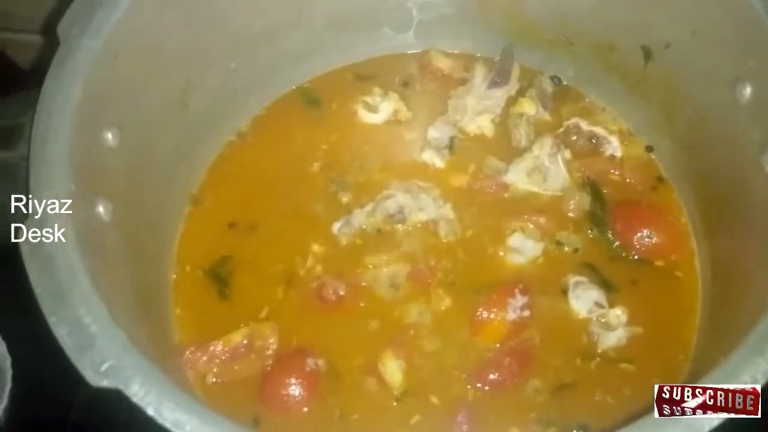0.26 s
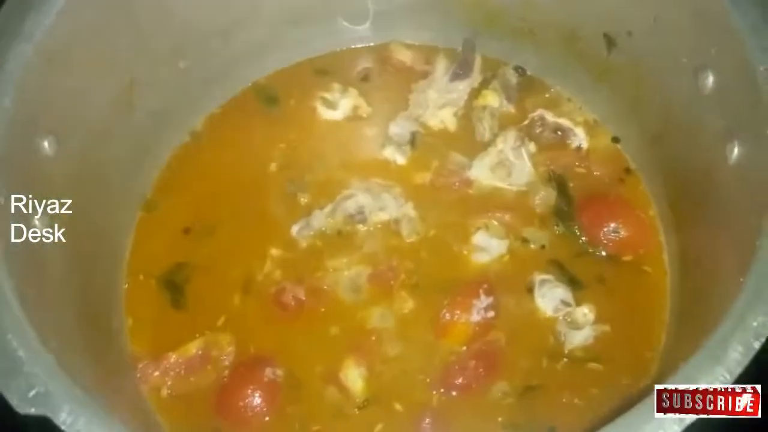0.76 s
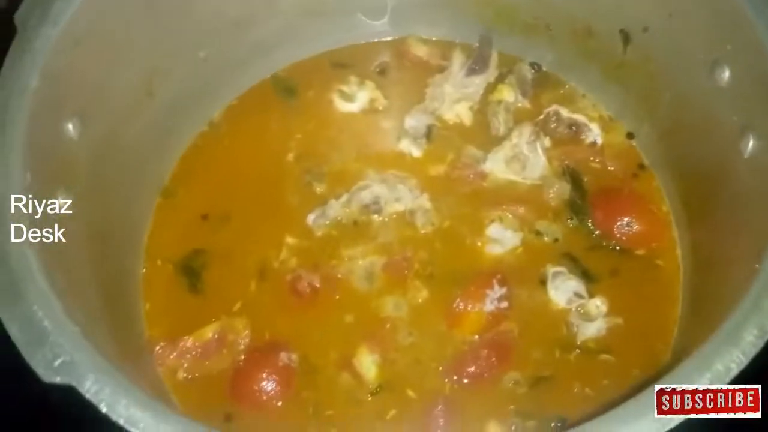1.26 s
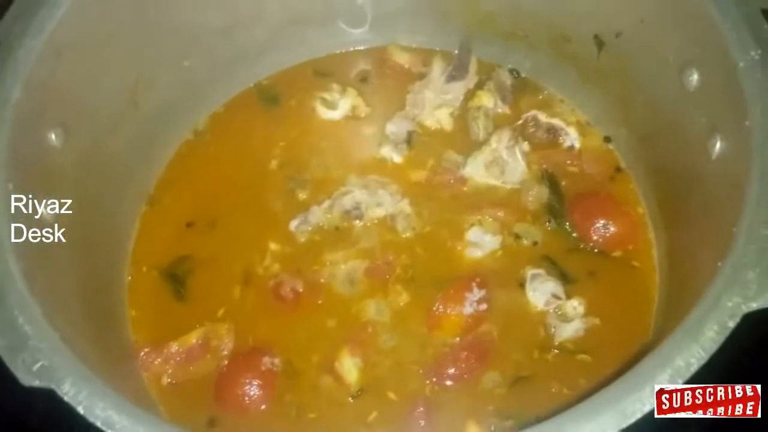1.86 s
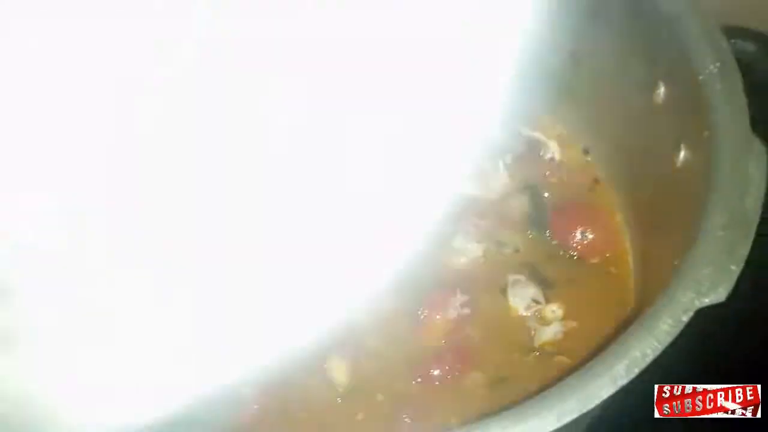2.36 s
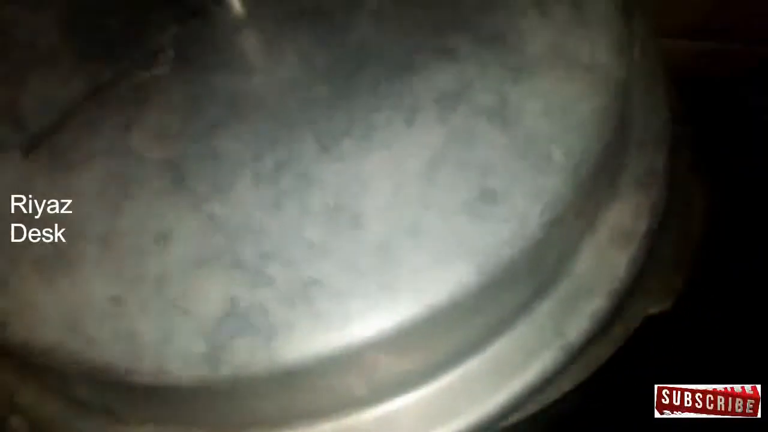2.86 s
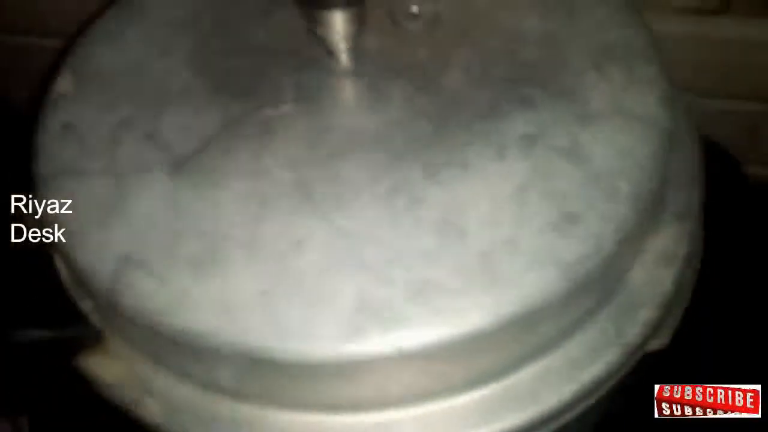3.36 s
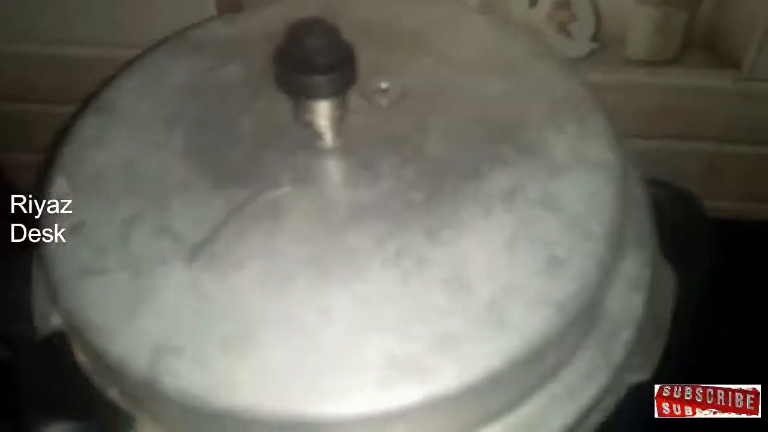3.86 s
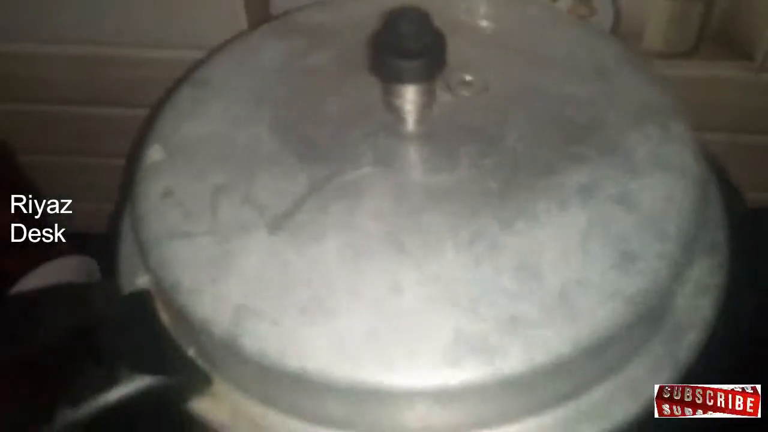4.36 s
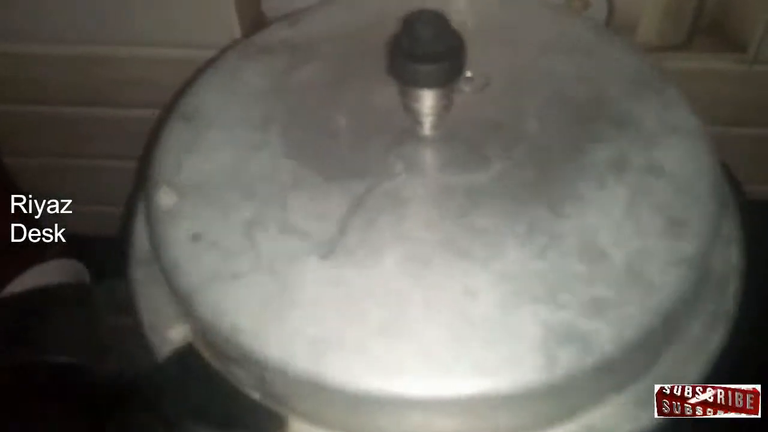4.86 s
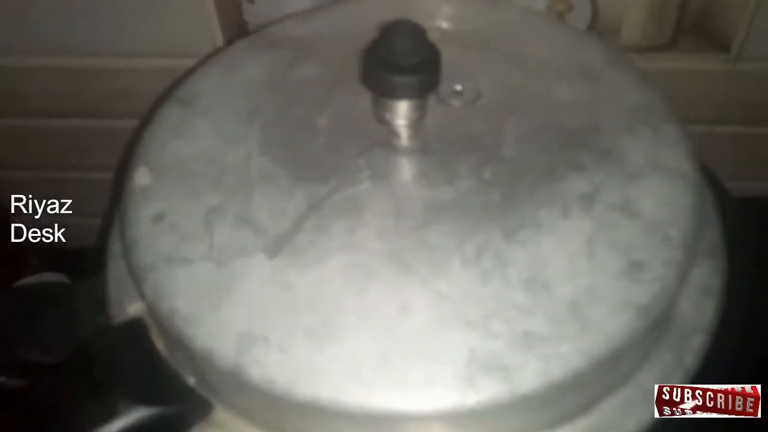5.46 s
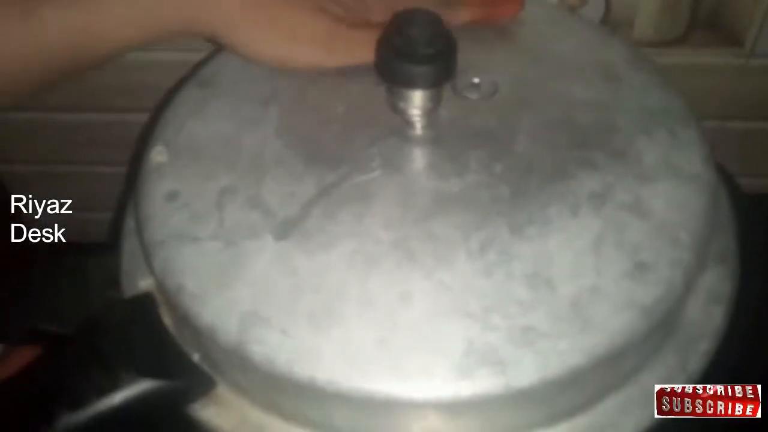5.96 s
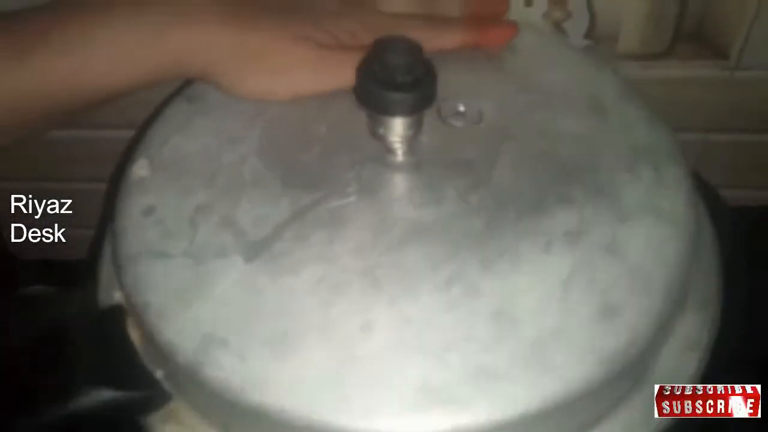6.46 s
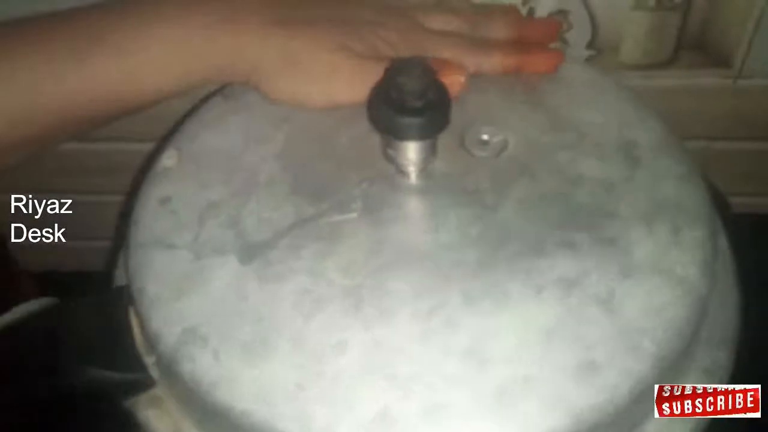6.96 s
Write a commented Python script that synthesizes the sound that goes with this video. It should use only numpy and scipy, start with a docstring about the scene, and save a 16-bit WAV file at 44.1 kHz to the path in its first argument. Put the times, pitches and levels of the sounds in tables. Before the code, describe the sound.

A metal pressure cooker lid knocks, then clanks, scrapes and judders onto its pot, locking with sharp clacks in a small hard kitchen.

```python
"""An aluminium pressure cooker lid is knocked, set on the pot, turned on its rubber gasket and locked.
Knocks come first, then faint pings; blows, scrapes and judder follow from 2.95 s, a broken tone from 5.27 s.
Noise bursts ring the lid's modes and the air in the pot; a small hard room answers with decaying noise.
Filtered noise gives a hiss and rumble throughout; all is almost mono and stops short at 7.155 s."""
import sys
import numpy as np
from scipy import signal
from scipy.fft import rfft, irfft, next_fast_len
from scipy.io import wavfile
from scipy.ndimage import uniform_filter1d, map_coordinates

SR = 44100
rng = np.random.default_rng(int(sys.argv[2]) if len(sys.argv) > 2 else 0)


def store_wav(level_fs):
    """Save 16-bit WAV to argv[1]."""
    pcm = np.round(np.clip(np.atleast_2d(level_fs), -1, 1) * 32767)
    wavfile.write(sys.argv[1], SR, pcm.T.astype(np.int16))


N = 317696
SIZE = next_fast_len(N + SR // 2)
HZ = np.fft.rfftfreq(SIZE, 1 / SR)
TIME = np.arange(N) / SR


def amp(db):
    """dB to gain."""
    return 10 ** (np.asarray(db) / 20)


def unit(x):
    """Scaled to rms 1."""
    return x / np.sqrt(np.mean(np.abs(x) ** 2) + 1e-20)


def along(points, hz=HZ):
    """(Hz, value) points interpolated on a log frequency axis."""
    point_hz, value = np.transpose(points)
    return np.interp(np.log(hz + 1), np.log(point_hz + 1), value)


def curve(tables, index):
    """One column of timed rows as a value per sample."""
    rows = np.vstack(tables)
    return np.interp(TIME, rows[:, 0], rows[:, index])


def strokes(tables, index):
    """A dB column as gain, silent outside its tables, with soft edges."""
    gain = np.zeros(N)
    for table in tables:
        rows = np.array(table)
        gain = gain + np.interp(TIME, rows[:, 0], amp(rows[:, index]), 0, 0)
    return uniform_filter1d(uniform_filter1d(gain, size=300), size=300)


def wobble(rate):
    """A smooth random curve, rate knots a second."""
    return map_coordinates(rng.standard_normal(int(N * rate / SR) + 4), [TIME * rate])


def filtered(x, response):
    """x times a response on the HZ grid."""
    return irfft(rfft(x, SIZE) * response, SIZE)[..., :N]


def causal(gain):
    """The minimum-phase response with this gain, by folding the cepstrum."""
    cepstrum = irfft(np.log(gain + 1e-6), SIZE)
    cepstrum[1:SIZE // 2] *= 2
    cepstrum[SIZE // 2 + 1:] = 0
    return np.exp(rfft(cepstrum))


def narrow(pitch_hz, width_hz):
    """Noise in a steep resonance that follows a pitch curve; its size wavers less than pure noise."""
    slow = rng.standard_normal(N) + 1j * rng.standard_normal(N)
    for _ in range(3):
        slow = signal.lfilter([1], [1, -np.exp(-2 * np.pi * width_hz / SR)], slow)
    slow = unit(slow)
    slow = slow / (np.abs(slow) + 0.19)
    carrier = np.exp(2j * np.pi * np.cumsum(pitch_hz) / SR)
    return unit(np.real(slow * carrier))


def after_blows(levels_db, t60_s):
    """An envelope that rises within milliseconds of each blow and dies away."""
    kicks = np.zeros(N)
    np.add.at(kicks, [round(row[0] * SR) for row in BLOWS], amp(levels_db))
    rising = signal.lfilter([.01], [1, -.99], kicks) * 100
    return signal.lfilter([.01], [1, -amp(-60 / t60_s / SR)], rising)


# blows on the metal: start_s, clank_db, body_re_clank_db, edge_re_clank_db, thud_db, rattle_hold_s,
# rattle_t60_s (at least 0.005), spot_hz (note of the struck spot), spot_re_clank_db
BLOWS = [(0.0004, -23, -7.5, -12.5, -27.5, 0.0032, 0.091, 1935, -2),
         (0.3681, -31.5, 0.5, -9, -32, 0.033, 0.076, 2200, 7.5),
         (2.9577, -13.5, -7, -15, -20, 0.001, 0.033, 1423, -3.5),
         (2.9874, -14, -4, -7, -23, 0.00056, 0.053, 2170, -12),
         (3.0033, -30, -10, -8, -43.5, 0.0015, 0.075, 1670, 1),
         (3.085, -38.5, 4.5, -5.5, -26.5, 0.0044, .02, 1660, 8.5),
         (3.1317, -33, -6, -11, -54, .002, 0.026, 2170, -16),
         (3.2548, -49.5, 16.5, -8, -33, 0.0017, 0.026, 2024, 13.5),
         (3.3253, -49.5, 9, -2.5, -25.5, 0.0017, 0.03, 2133, 18.5),
         (3.58, -29, -2, -11, -24.5, 0.0011, 0.05, 1049, -2),
         (3.8794, -59, -12, -3, -28.5, 0.0025, 0.021, 1522, 5),
         (4.0646, -41.5, -13, -16, -31.5, 0.0024, .065, 1089, 2.5),
         (4.0977, -33.5, 1, -5.5, -23, 0.0013, .053, 1013, 0),
         (4.1694, -45, -4, -8, -45.5, 0.0054, 0.015, 1079, 7),
         (4.292, -39.5, 2, -20, -47, 0.0031, 0.041, 1501, -13),
         (4.353, -51.5, -24, -7.5, -21.5, 0.0037, .041, 1130, 3),
         (4.386, -29, 2.5, -17.5, -18, 0.0018, 0.014, 1472, -14),
         (4.398, -24.5, -14.5, -13.5, -27, 0.0018, 0.059, 1470, 7),
         (4.4695, -14.5, -12, -12.5, -43, 0.00091, 0.036, 2203, 0),
         (4.587, -40, -17, -8, -51, 0.0012, .03, 1531, 6.5),
         (4.6683, -56, 13, -19, -36.5, 0.0014, 0.05, 1797, 15),
         (4.7512, -40.5, 7, -6, -35, 0.00069, 0.029, 1093, -16),
         (4.8569, -28, 7, -1, -65, .002, .023, 1415, 4),
         (4.8673, -15, -1, -10.5, -34, 0.00067, .049, 2130, -6.5),
         (5.1417, -14, -6, -9.5, -24.5, 0.0013, 0.067, 1190, -4),
         (5.1847, -19.5, -3.5, -13.5, -36, 0.001, 0.045, 2116, -3.5),
         (5.3397, -48.5, 3, -11, -46, 0.0023, 0.044, 886, 0),
         (5.6315, -40, -5.5, -21.5, -50, 0.0005, 0.051, 2078, -2.5),
         (5.686, -49, 3, -28, -41.5, 0.0013, 0.043, 1088, 1),
         (5.7775, -55.5, 1, -40, -52, 0.0019, .07, 902, 6),
         (6.0906, -44, 10, -48, -30, 0.0018, 0.088, 920, -11),
         (6.4404, -55.5, 11.5, -3, -35.5, 0.0023, 0.063, 2196, 10),
         (6.4551, -21, -2.5, -17, -32.5, 0.0026, 0.035, 2308, -7.5),
         (6.486, -46, -14, -5, -31, 0.0012, .048, 987, 15.5),
         (6.729, -22, -14.5, -10, -45, 0.0025, 0.026, 2140, -1),
         (6.9715, -31, 0, -30, -40.5, 0.0012, 0.064, 2022, -2),
         (7.0039, -28.5, -10.5, -17.5, -40, 0.009, 0.046, 1960, -2)]
# strokes of the lid dragged round the rim: time_s, scrape_db, edge_re_scrape_db
SCRAPE = [
    [(3.02, -36.5, -17.5), (3.1, -47.5, -17), (3.2, -52.5, -8.5), (3.27, -44, -9.5), (3.33, -50.5, -2.5),
     (3.42, -74.5, -16), (3.5, -57, -11), (3.57, -51, -12)],
    [(3.6, -39.5, -8.5), (3.65, -60, -16.5), (3.7, -67, 3.5), (3.78, -78, -11)],
    [(3.79, -69, -14.5), (3.84, -48, -14), (3.89, -44, -10.5), (3.93, -46, -16.5), (3.98, -43, -11.5),
     (4.05, -43.5, -4), (4.1, -41.5, -13), (4.16, -49.5, -8), (4.24, -75, -7.5), (4.28, -56, 6.5)],
    [(4.3, -49.5, -9), (4.34, -49.5, -11), (4.37, -39, -14.5), (4.405, -35.5, -8), (4.44, -47, -11.5),
     (4.465, -49.5, -12)],
    [(4.5, -61, -8), (4.58, -57, -10), (4.64, -57.5, -11), (4.7, -55, -7.5), (4.79, -50.5, -16.5),
     (4.855, -44, -9)],
    [(4.9, -36, -11.5), (4.95, -48.5, -11), (5.0, -52, -11.5), (5.08, -57, -8.5), (5.135, -54.5, 0.5)],
    [(6.48, -49, -3.5), (6.53, -49.5, -5), (6.6, -52.5, -6.5), (6.67, -56, -6.5), (6.72, -51, -5.5)],
    [(6.76, -61.5, 0), (6.82, -61, -1.5), (6.89, -67, -2.5), (6.96, -62, -8), (7.06, -69.5, 1),
     (7.12, -62.5, 0), (7.15, -59, 2)],
]
# force bands thud, body, clank, edge, top: low_hz, high_hz
BANDS = [(0, 370), (420, 1400), (1400, 3200), (3200, 8500), (8500, 30000)]
RISE_S = 0.0037  # rattle
CRACK_RISE_S, CRACK_DB, CRACK_T60_S = 0.00065, 4, 0.0049  # first crack, re rattle
CRACK_LOSS_DB_PER_S = 918  # per second of rattle hold
CRACK_TILT_DB = -1.5  # crack is weaker in the high bands
SHIVER_DB, SHIVER_T60_S = -26, 0.073  # lid shivers on the rim after a blow
TOP_DB, TOP_DB_PER_DB = -9, 0.29  # top band re edge at a 0 dB clank; its loss per dB of weaker blow
SCRAPE_BODY_DB, SCRAPE_TOP_DB = -1, -16  # body re scrape, top re edge


def contact():
    """Force on the metal per band, and the struck spot's note: blows crack and rattle, scrapes are gritty."""
    force = np.zeros((len(BANDS) + 1, N + SR))  # last row: struck spot
    t = np.arange(SR // 4) / SR
    spot_hz = np.full(N, 2000.)
    tilt = np.array([[-2], [-.5], [0], [.5], [1], [-1]])
    for start_s, db, body_db, edge_db, thud_db, hold_s, t60_s, hz, spot_db in BLOWS:
        rattle = amp(-60 * np.clip(t - hold_s, 0, None) / max(t60_s, .005))
        rattle = rattle + amp(SHIVER_DB - 60 * t / SHIVER_T60_S)
        crack_db = CRACK_DB - CRACK_LOSS_DB_PER_S * hold_s - 60 * t / CRACK_T60_S
        crack = (1 - np.exp(-t / CRACK_RISE_S)) * amp(crack_db)
        shape = (1 - np.exp(-t / RISE_S)) * rattle + amp(CRACK_TILT_DB * tilt) * crack
        top_db = db + edge_db + TOP_DB + TOP_DB_PER_DB * db
        share = amp([thud_db, db + body_db, db, db + edge_db, top_db, db + spot_db])
        first = round(start_s * SR)
        force[:, first:][:, :len(t)] += share[:, None] * shape
        spot_hz[first:] = hz

    clumps_db = 1.5 * wobble(35) + 3 * wobble(250)  # grains of grit come in clumps
    edge_db = curve(SCRAPE, index=2)
    top_db = edge_db + SCRAPE_TOP_DB + 3 * wobble(20)
    scrape = strokes(SCRAPE, index=1)
    for row, band_db in enumerate((SCRAPE_BODY_DB, 0, edge_db, top_db), start=1):
        grit = unit(amp(clumps_db + 1.6 * wobble(18)))
        force[row, :N] += scrape * amp(band_db) * grit

    noise = force[:-1, :N] * rng.standard_normal(N)
    spot = uniform_filter1d(force[-1, :N], size=30) * narrow(spot_hz, width_hz=130)
    return noise, spot


HAND_S, HAND_FADE_S, HAND_DB = 5.54, 0.33, -12


def hand_damping_db():
    """Drive of the lid's modes: a hand on the lid damps its ring."""
    return HAND_DB * np.clip((TIME - HAND_S) / HAND_FADE_S, 0, 1)


# colour of a blow, relative density: freq_hz, level_db_per_hz
METAL = [(50, -27), (100, -9), (250, -4), (420, 0), (1100, -4.5), (2200, -2), (2600, -10.5), (4000, -21.5),
         (5700, -16.5), (7300, -31), (9500, -41.5), (13400, -38.5), (14700, -27), (15900, -28),
         (16800, -120)]
# modes of the lid: freq_hz, level_re_clank_db, t60_s (limited to 0.02-0.13 when played)
LID = [(379, -1, 0.21), (456, -1.5, 0.25), (749, -8, 0.36), (975, 5.5, 0.044), (1102, 5.5, 0.07),
       (1483, 4, 0.17), (1634, 4, 0.2), (1950, 2, 0.3), (2103, -5.5, 0.36), (2131, 4, 0.15),
       (2310, -20.5, 0.22), (2904, 2, 0.015), (3080, -3, 0.13), (3674, 5.5, 0.058), (4330, -4.5, 0.18),
       (5170, -2.5, 0.23), (5880, 0, 0.032), (6470, 0.5, 0.021), (8900, -1.5, 0.085), (10770, 8.5, 0.017)]


def mode(centre_hz, level_db, t60_s):
    """Response of one damped resonance; the gasket keeps every ring short."""
    width_hz = np.log(1000) / (np.pi * np.clip(t60_s, .02, .13))
    loss = 1j * HZ * width_hz
    return amp(level_db) * loss / (centre_hz ** 2 - HZ ** 2 + loss)


def lid():
    """The force sounds as a broad clank and rings the lid's modes."""
    colour = amp(along(METAL))
    force, clank = contact()
    for band_force, (low_hz, high_hz) in zip(force, BANDS):
        slopes = (1 + (low_hz / (HZ + 1)) ** 14) * (1 + (HZ / high_hz) ** 14)
        clank = clank + filtered(band_force, unit(causal(colour / np.sqrt(slopes))))
    free_db, out = hand_damping_db(), clank
    for k in range(4):  # the point of contact wanders: each set of modes gets its own varying drive
        drive = clank * amp(free_db + 4.9 * wobble(4.9))
        out = out + filtered(drive, sum(mode(*row) for row in LID[k::4]))
    return out + rim()


RIM_HZ, RIM_WIDTH_HZ = 2195, 30  # strongest note
SING_DB, SING_T60_S, RUB_SING_DB = -13.5, 0.33, -10  # re blow's spot; re scrape
SING_REACH_HZ = 300  # note distance that halves the power


def rim():
    """The rim sings on most after blows whose note lies near its own, and while it is rubbed."""
    db, spot_hz, spot_db = np.array(BLOWS)[:, [1, 7, 8]].T
    miss_db = 10 * np.log10(1 + ((spot_hz - RIM_HZ) / SING_REACH_HZ) ** 2)
    struck = after_blows(db + spot_db + SING_DB - miss_db, SING_T60_S)
    rubbed = amp(RUB_SING_DB) * strokes(SCRAPE, index=1)
    return (struck + rubbed) * narrow(np.full(N, float(RIM_HZ)), width_hz=RIM_WIDTH_HZ)


# gasket juddering while the lid turns: time_s, pot_boom_db, stove_shake_db
JUDDER = [
    [(2.958, -22.5, -51), (2.99, -39, -44), (3.066, -27, -39), (3.094, -33, -69), (3.142, -47, -42),
     (3.188, -49, -54), (3.2, -42, -51)],
    [(3.2, -41.5, -44), (3.252, -33.5, -50), (3.274, -32, -44), (3.298, -37, -39), (3.322, -25.5, -34),
     (3.344, -37.5, -31), (3.43, -48, -53)],
    [(3.43, -53, -49), (3.46, -51, -38), (3.592, -33.5, -32.5), (3.638, -34.5, -31), (3.67, -65, -42),
     (3.708, -58, -56), (3.75, -61, -55)],
    [(3.8, -52, -51), (3.86, -32, -36.5), (3.9, -42, -47), (3.944, -29, -35.5), (4.002, -27, -39),
     (4.028, -48, -40), (4.05, -35, -30)],
    [(4.05, -26, -30), (4.104, -37.5, -39.5), (4.124, -31, -51), (4.164, -35.5, -35), (4.228, -48, -42),
     (4.244, -41, -47), (4.27, -34, -40)],
    [(4.285, -53, -51), (4.307, -27.5, -39), (4.329, -39, -42), (4.397, -30, -53), (4.537, -48, -31),
     (4.553, -52, -49), (4.58, -58, -28)],
    [(4.6, -45, -57), (4.68, -37, -50), (4.718, -37.5, -37.5), (4.76, -28, -50), (4.79, -33.5, -39.5),
     (4.868, -37.5, -35), (4.88, -33.5, -29)],
]
# air in the pot, with the balance of a thud: time_s, pitch_hz, stove_re_pot_db
POT = [(0, 205, 34), (.2, 210, 35), (.36, 285, 29), (2.95, 290, -11.5), (3.26, 282, -5.5), (3.33, 226, 18),
       (3.7, 222, 0), (3.95, 240, 0), (4.3, 225, -1), (4.7, 233, 0.5), (5.1, 226, 15), (6.0, 230, 9),
       (7.2, 236, 4)]
BOOM_DB, BOOM_T60_S = -10.5, 0.12  # re thud, before the pot/stove balance


def gasket():
    """Rubber sticks and slips irregularly; slips and thuds boom in the pot and shake the stove."""
    slips = unit(amp(3 * wobble(45)))
    thuds = after_blows(np.array(BLOWS)[:, 4] + BOOM_DB, BOOM_T60_S)
    lean = amp(curve([POT], index=2) / 2)
    pot_level = strokes(JUDDER, index=1) + thuds / lean
    pot = pot_level * narrow(curve([POT], index=1), width_hz=57.0)
    stove_level = strokes(JUDDER, index=2) + thuds * lean
    stove = stove_level * narrow(np.full(N, 155.), width_hz=40.6)
    return filtered(slips * (pot + stove), 1 / (1 + (95 / (HZ + 1)) ** 4))  # too small to boom lower


# stretches of a faint tone: start_s, length_s, level_db
WHINE = [(5.265, 0.68, -53.5), (5.952, .48, -57), (6.24, 0.084, -48)]
# faint short pings: start_s, pitch_hz, level_db, t60_s
PINGS = [(0.721, 1520, -50.5, 0.17), (1.55, 14600, -50, 0.11), (1.61, 9400, -65, 0.1),
         (1.927, 1510, -35.5, 0.085), (2.15, 8340, -66, 0.17), (2.185, 8696, -59.5, 0.13),
         (6.923, 3070, -39, 0.052)]
WHINE_HZ, WHINE_EDGE_S, WHINE_SAG_DB = 828, .015, -6


def small_tones():
    """Pings are decaying sines of unsteady phase; a broken wavering tone is narrow noise."""
    bursts = []
    for start_s, length_s, db in WHINE:
        end_s = start_s + length_s
        bursts.append([(start_s, db - 22), (start_s + WHINE_EDGE_S, db),
                       (end_s, db + WHINE_SAG_DB), (end_s + WHINE_EDGE_S, db - 31)])
    flutter = unit(amp(3.5 * wobble(16)))
    out = strokes(bursts, index=1) * flutter * narrow(WHINE_HZ + 15 * wobble(7), width_hz=40)
    for start_s, hz, db, t60_s in PINGS:
        t = np.clip(TIME - start_s, 0, None)
        envelope = amp(db - 60 * t / t60_s) * (1 - np.exp(-t / 0.0061))
        out = out + envelope * np.sin(2 * np.pi * hz * t + 1.1 * wobble(60))
    return out


# decay of the room: freq_hz, t60_s
ROOM = [(100, 0.61), (700, 0.4), (2000, 0.32), (5000, 0.34), (13000, 0.18)]


def room(x):
    """Each frequency of the walls' answer dies at its own speed; every sixth of a second meets other echoes."""
    out, step = np.zeros(N + 2 * SR), SR // 6
    for k in range(0, N, step):
        hz, t, z = signal.stft(rng.standard_normal(SR // 2), SR, nperseg=256)
        decay = amp(-60 * t / along(ROOM, hz)[:, None])
        tail = signal.istft(z * decay, SR, nperseg=256)[1]
        wet = signal.fftconvolve(x[k:k + step], tail / np.linalg.norm(tail))
        out[k + 150:][:len(wet)] += wet  # samples: the first wall is half a metre away
    return out[:N]


# background levels before trim: time_s, hiss_db, rumble_db
KITCHEN = [(0, -54, -56), (.6, -55.5, -56), (1.2, -56.5, -56.5), (1.9, -54, -55), (2.3, -55.5, -56),
           (2.9, -55.5, -53.5), (3.2, -51.5, -58.5), (5.0, -48, -45.5), (5.5, -48, -51), (6.0, -51, -49),
           (6.5, -50, -51), (7.2, -51, -54)]
# hiss colour, relative density: freq_hz, level_db_per_hz
HISS = [(120, -18.5), (200, 2), (430, -2.5), (800, -5), (1200, -5.5), (2100, 6), (2450, -4.5), (2900, -17),
        (6300, -21), (7600, -33), (10000, -36), (13500, -33.5), (14900, -25.5), (16000, -14)]
# rumble colour, relative density: freq_hz, level_db_per_hz
RUMBLE = [(12, -42), (20, -21.5), (81, -3), (173, -6), (195, -16), (219, -23.5), (260, -17), (340, -30.5),
          (570, -120)]
HISS_TRIM_DB, RUMBLE_TRIM_DB = -2.5, -3.5


def kitchen():
    """Noise hiss with patches of random gain in time and frequency, over a wavering noise rumble."""
    z = signal.stft(rng.standard_normal(N), nperseg=512)[2]
    field = uniform_filter1d(rng.standard_normal(z.shape), size=6, axis=0)
    field = uniform_filter1d(field, size=12, axis=1)
    patchy = signal.istft(z * amp(1.8 * unit(field)), nperseg=512)[1][:N]
    hiss_db = curve([KITCHEN], index=1) + HISS_TRIM_DB + 0.33 * wobble(17.0)
    hiss = amp(hiss_db) * unit(filtered(patchy, amp(along(HISS))))
    rumble = unit(filtered(rng.standard_normal(N), amp(along(RUMBLE))))
    rumble_db = curve([KITCHEN], index=2) + RUMBLE_TRIM_DB + 0.36 * wobble(12.0)
    return hiss + amp(rumble_db) * rumble


def scene():
    """Pot and lid in the room, over the kitchen's noise."""
    metal, boom = lid(), gasket()
    echoes = room(amp(-7.0) * metal + amp(-17.0) * boom)
    mid = metal + boom + echoes + small_tones() + kitchen()
    return np.array([mid, mid])


TOP_HZ, END_S, STOP_FADE_S = 15800, 7.155, 0.00063


def record(dry):
    """The treble differs a little between the channels; band limit; the sound stops short at the end."""
    side = filtered(dry[0] * wobble(300), amp(-6) / (1 + (5800 / (HZ + 1)) ** 12))
    side = filtered(side, HZ > 3500)
    stop = np.clip((END_S - TIME) / STOP_FADE_S, 0, 1)
    return filtered((dry + [side, -side]) * stop, HZ < TOP_HZ)


dry = scene()
out = record(dry)
store_wav(out)
```